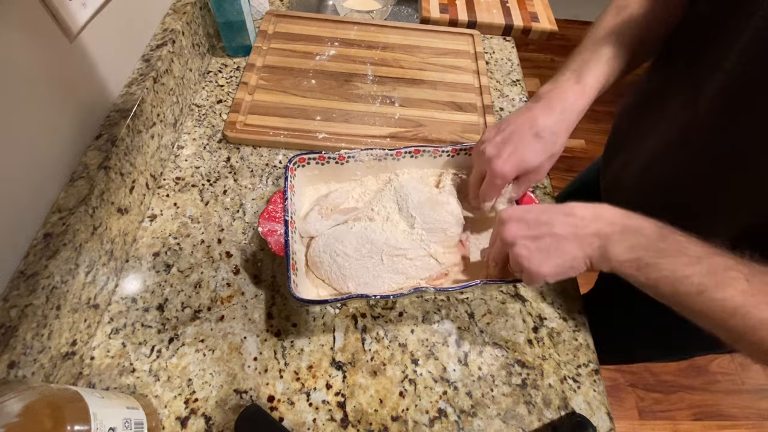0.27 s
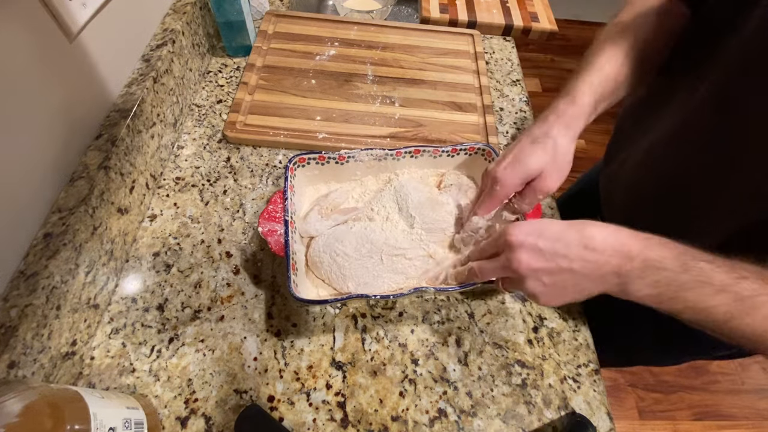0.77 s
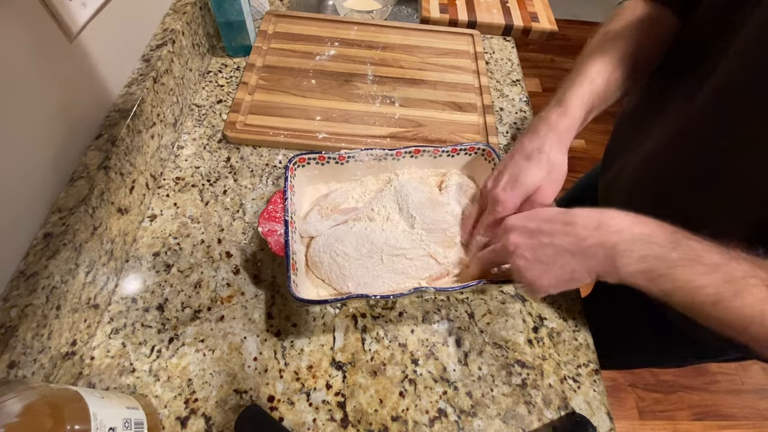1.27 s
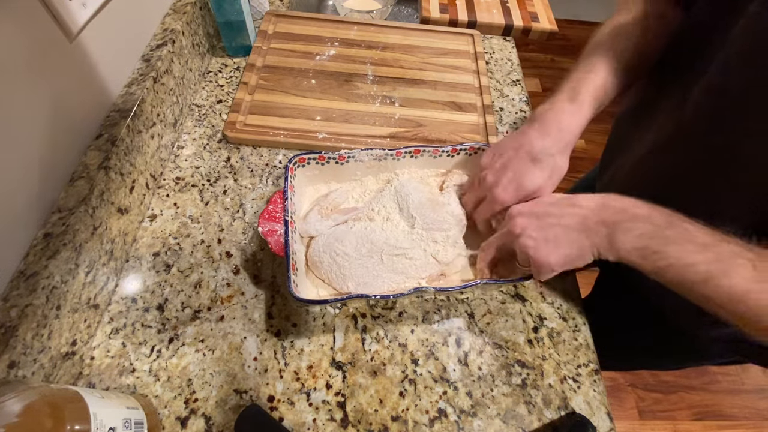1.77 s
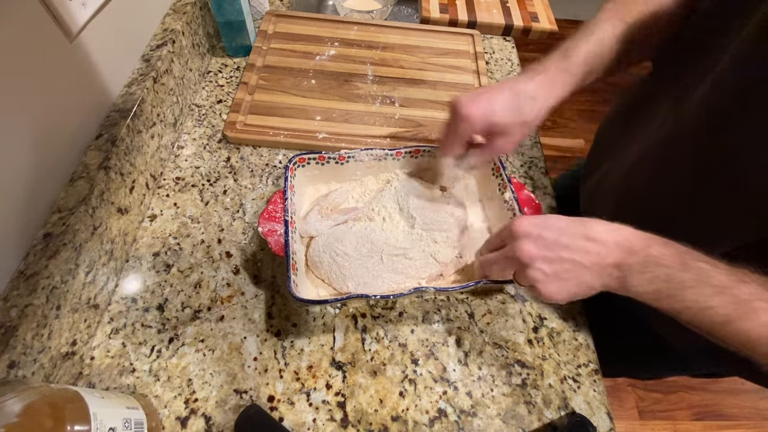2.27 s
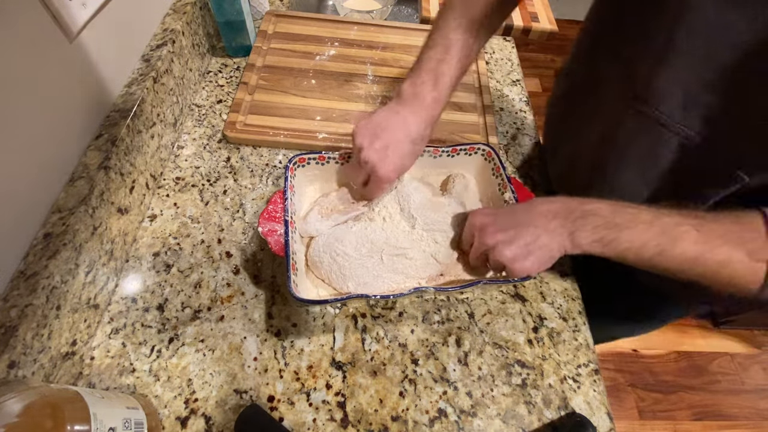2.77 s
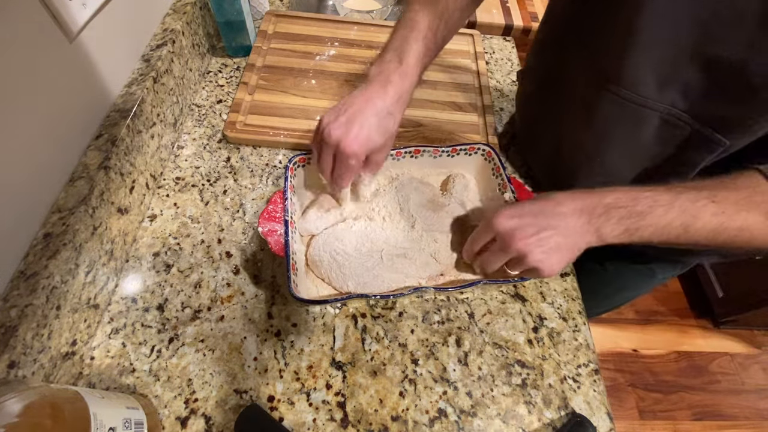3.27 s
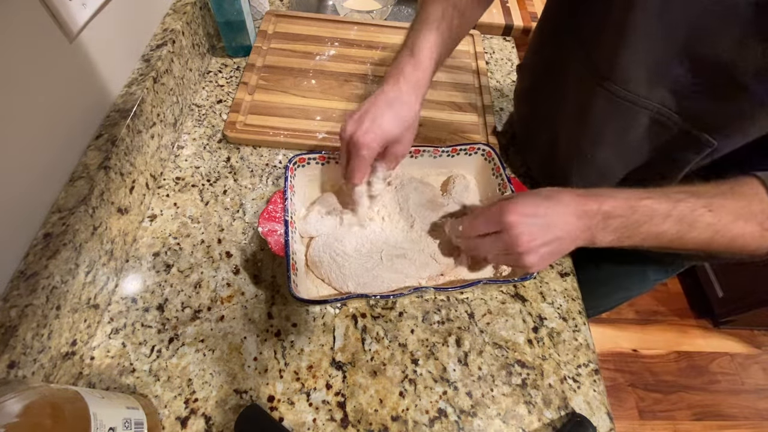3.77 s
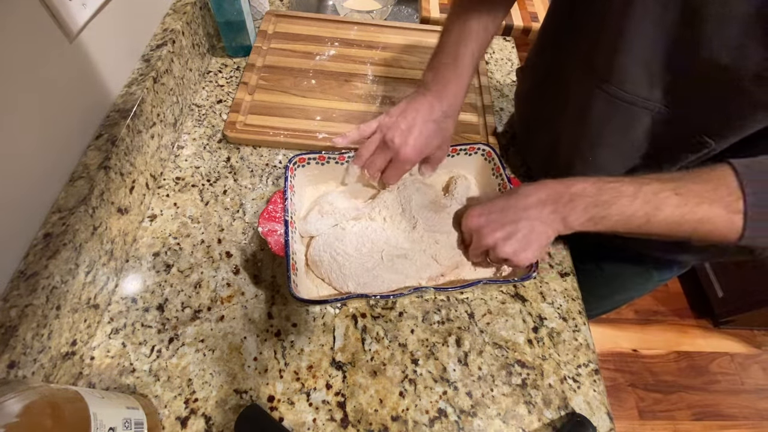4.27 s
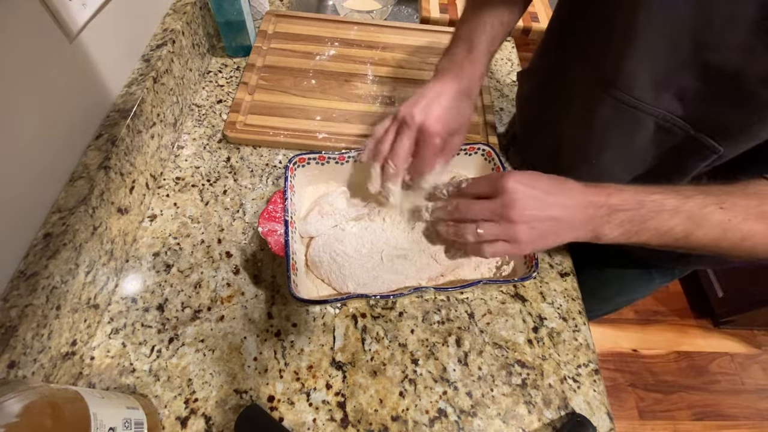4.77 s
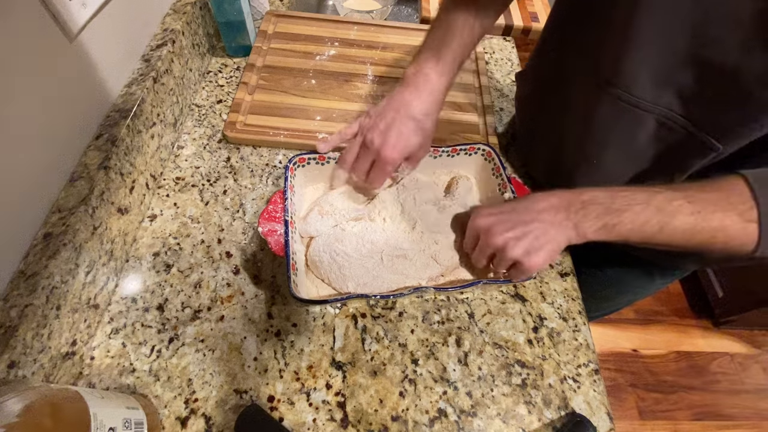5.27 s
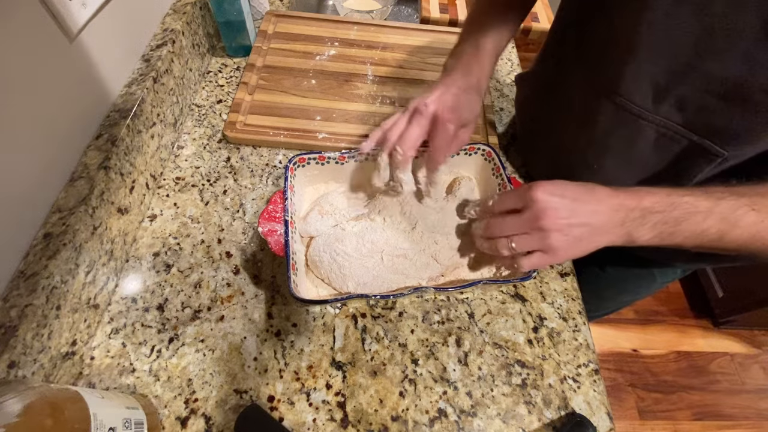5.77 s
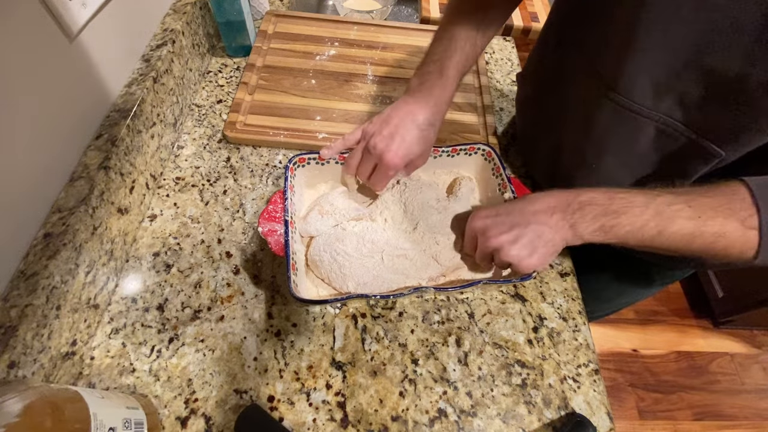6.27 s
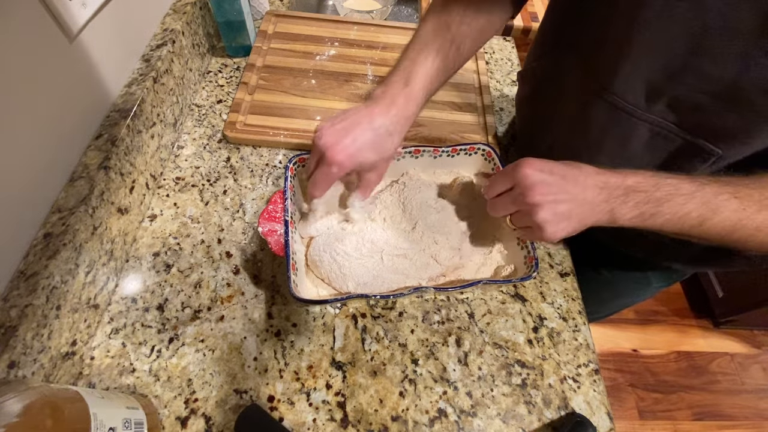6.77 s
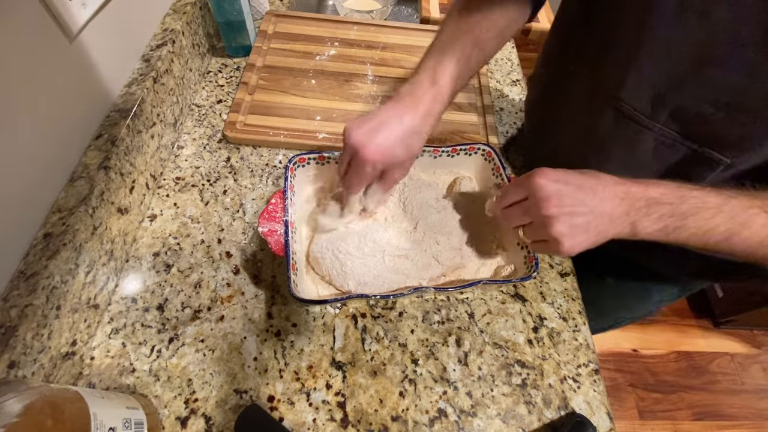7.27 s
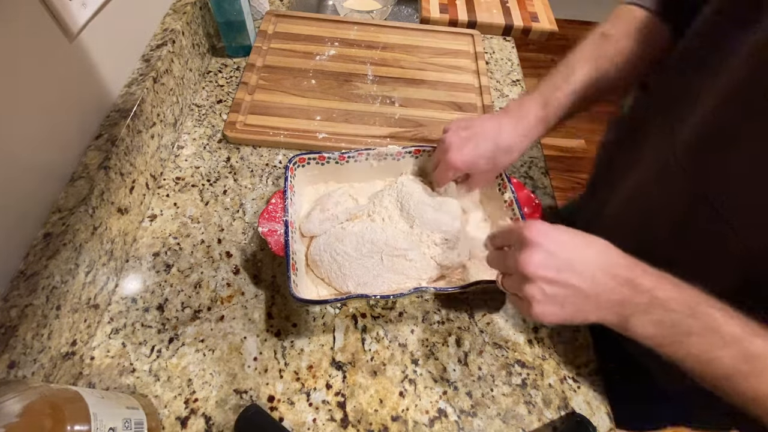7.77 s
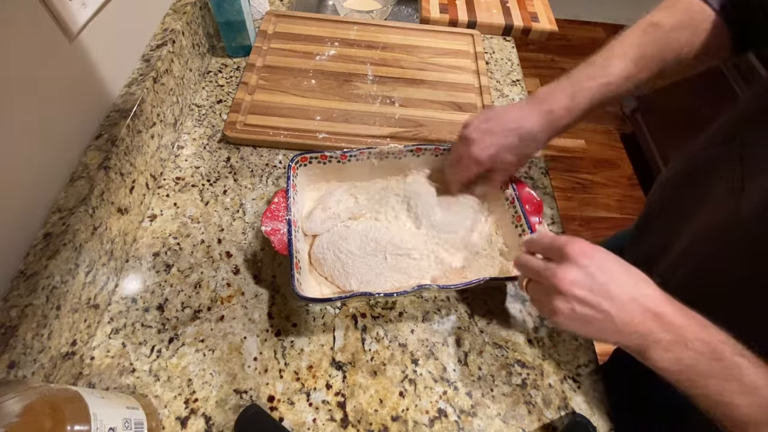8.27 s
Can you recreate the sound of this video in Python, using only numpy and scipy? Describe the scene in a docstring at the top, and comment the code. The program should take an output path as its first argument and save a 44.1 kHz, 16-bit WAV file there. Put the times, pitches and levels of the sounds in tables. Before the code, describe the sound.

A stereo microphone near a stone counter picks up soft, airy flour rustling from two hands coating chicken. Small dish bumps come first, then mostly gentle rubbing with sparse sticky clicks and muffled pats, a clear ceramic tap past the middle, and sharper ticks later. Finally the ceramic dish is shoved and set down hard, the loudest event, with brief room reflections. Deep steady hum and quiet air lie underneath.

```python
"""Humming kitchen, stone counter: hands rub and pat dry flour onto raw chicken in a ceramic dish.
Flour hisses as dense random grains; sticky skin ticks and judders as short bursts of coloured noise.
The meat thuds as damped sines; fingers nudge the dish, a bank of decaying modes.
The dish scrapes briefly over the stone at the start and near the end, where it also knocks down hard.
Behind it lie wavering hum lines, a low rush of air and a faint hiss."""
import sys
import numpy as np
from scipy import signal
from scipy.fft import rfft, irfft, next_fast_len
from scipy.io import wavfile

SR = 44100
rng = np.random.default_rng(int(sys.argv[2]) if len(sys.argv) > 2 else 0)


def dump_mix(stems):
    """Bounce the given channels to the path in sys.argv[1] as a 16-bit WAV at rate SR."""
    frames = np.atleast_2d(stems).T  # one column per channel
    limited = np.clip(frames, -1, 1)  # hard clip at full scale
    pcm = np.round(limited * 32767).astype(np.int16)
    wavfile.write(sys.argv[1], SR, pcm)


N = 376173
TIME_S = np.arange(N) / SR

# strokes of the fingers through the flour: (fastest moment [s], speeding up [s], slowing down [s],
# powder hiss [dB], skin rasp over the hiss before its gain [dB], meat smear likewise [dB])
STROKES = [(.012, 0.055, 0.054, -70, -2, -0.5), (.24, 0.033, 0.024, -73.5, -2, -6.5),
           (.35, 0.044, 0.018, -81, -15, -2.5), (.46, 0.084, 0.17, -72.5, -4, -11),
           (.62, 0.17, 0.14, -75, -3.5, -9), (1.15, 0.1, 0.067, -66.5, -1, -12),
           (1.26, 0.058, 0.019, -68, -13, -16), (1.42, 0.17, 0.071, -89.5, 3.5, -17),
           (1.60, 0.017, 0.021, -74.5, -9, -5), (1.80, 0.15, 0.077, -72, 1.5, -5.5),
           (1.95, 0.19, 0.074, -76.5, 1.5, -2), (1.995, .02, .025, -73, -14, -10),
           (2.145, 0.035, 0.036, -81, -5, -10), (2.43, 0.057, 0.12, -76.5, -3, -2.5),
           (2.52, 0.034, .03, -83, 1, -9), (2.64, 0.11, 0.049, -78, 1.5, 3),
           (2.72, 0.17, 0.12, -77, -2, -10), (3.00, 0.15, 0.099, -84, 5.5, -1.5),
           (3.25, 0.088, 0.043, -86, 9.5, -14), (3.385, 0.067, 0.15, -79.5, -4, -0.5),
           (3.53, 0.096, 0.052, -75.5, -3.5, -4), (3.71, 0.14, 0.072, -73, -1.5, -7.5),
           (3.87, 0.039, 0.031, -74.5, -11, -10), (3.96, 0.037, 0.046, -80, -2, -12),
           (4.10, 0.17, 0.2, -70, -6, -14), (4.38, 0.17, 0.19, -73, -5.5, -5.5),
           (4.465, 0.05, 0.045, -69.5, -5, -7), (4.515, 0.031, .035, -73, -5, -12),
           (4.63, 0.038, 0.023, -80, -2, -16), (4.73, 0.046, 0.069, -82, -15, -8),
           (5.07, 0.045, 0.084, -75.5, -19, -16), (5.225, 0.049, 0.13, -71.5, -15, -24),
           (5.30, 0.057, 0.061, -77, 0, 6.5), (5.45, 0.077, 0.048, -75, -6, -12),
           (5.535, 0.051, 0.07, -71.5, -8, -22), (5.70, 0.026, 0.037, -73, -8, -22),
           (6.015, 0.08, 0.067, -79.5, -9, -1), (6.18, 0.082, 0.16, -69.5, -2, -5),
           (6.36, 0.092, 0.045, -74, -8, -8), (6.455, 0.053, 0.03, -71, -8, -24),
           (6.56, 0.015, 0.017, -78, -6, -11), (6.81, 0.13, 0.093, -84, 5.5, -1.5),
           (6.9, 0.04, 0.021, -74.5, -6, -21), (6.962, .015, .025, -79, 2, -18),
           (7.06, 0.059, 0.082, -80, 7.5, 5), (7.24, 0.12, 0.1, -82.5, 2, -9),
           (7.38, 0.18, 0.14, -87.5, 6, 5), (7.53, 0.071, 0.092, -85.5, 2, -1),
           (7.74, 0.084, 0.048, -80.5, 7, 3), (7.85, 0.068, 0.12, -72.5, 7, 2),
           (8.00, 0.12, 0.19, -72.5, 4, -1), (8.115, 0.038, 0.039, -69, 5.5, -5.5),
           (8.21, 0.093, 0.51, -85.5, 13, 12), (8.33, 0.073, 0.064, -93, 8, 0),
           (8.415, 0.027, 0.12, -75, 3.5, 0.5)]
# relative spectra of loose powder, floured skin under pressure, meat sliding: (frequency [Hz], density [dB])
POWDER_SPECTRUM = [(2500, -6.5), (4200, -3), (6500, 0.5), (10000, 3), (12000, 2.5), (14000, 5),
                   (15200, -4.5), (16000, -9)]
SKIN_SPECTRUM = [(1500, -0.5), (2400, -4), (3300, 4), (4400, 1), (5500, 0.5), (6500, 4.5), (9000, -5.5),
                 (15000, -17)]
MEAT_SPECTRUM = [(400, -0.5), (900, 3), (1400, 0), (2100, 1), (2700, -9.5), (4000, -18)]
SPEED_POWER = 1.6  # friction noise grows as sliding speed to this power
IDLE_POWDER_DB, IDLE_SKIN_DB, IDLE_MEAT_DB = -96, -94.5, -107  # the fingers never quite rest
SKIN_GAIN_DB, MEAT_GAIN_DB = -2, 6.5  # for all strokes
TREMOR_DB, TREMOR_PER_S = 2, 60  # unevenness of the sliding fingers
CRUMBS_PER_S, CRUMB_DB = 160, -7.5  # small lumps breaking, relative to the fine grains

# damp fingers catch and judder: (fastest moment [s], speeding up [s], slowing down [s],
# centre of the rasp [Hz], level before the speed envelope [dB], lag of the left microphone [ms])
CATCHES = [(.222, 0.013, .02, 5000, -82, .2), (1.143, 0.056, 0.015, 4360, -72, 0.24),
           (1.82, 0.032, .03, 4660, -71, 0.23), (2.137, .005, .014, 4900, -76, .25),
           (2.602, .008, .008, 2550, -62.5, 0.32), (2.652, .022, 0.012, 2860, -65.5, 0.34),
           (3.695, 0.037, 0.045, 4500, -80, 0.18), (3.828, .01, .012, 3000, -79, 0.3),
           (3.895, .012, .015, 4300, -83, .2), (4.468, .02, 0.024, 2280, -71, 0.32),
           (7.83, 0.021, .02, 2600, -69, -0.33), (8.11, .01, 0.023, 2600, -67, -0.4)]
JUDDER_PER_S, JUDDER_SCATTER_DB = 900, 1  # slips of a catching finger

# ticks of sticky skin and crumbs, relative levels: (time [s], moist snap [dB], dry crackle [dB])
TICKS = [(0.065, -83, -62.5), (0.194, -48.5, -78), (0.2703, -61, -62), (0.418, -79, -56), (0.315, -69, -74),
         (0.77, -90, -74), (0.802, -87, -65), (0.809, -90, -66), (0.824, -88, -63), (0.986, -55.5, -58),
         (1.028, -62, -89), (1.319, -67, -65), (1.5937, -69, -85), (3.635, -73, -68), (3.654, -71, -78),
         (3.713, -49.5, -80), (3.8224, -64.5, -73), (4.24, -64, -65), (4.447, -71, -64), (4.682, -88, -71),
         (4.737, -68, -69), (5.615, -79, -66), (5.696, -76, -64), (7.018, -64, -75), (7.044, -46, -43.5),
         (7.154, -75, -64), (7.1818, -65, -57.5), (7.651, -62.5, -64), (7.6744, -80, -65),
         (7.991, -68, -51), (8.108, -57, -79), (8.1748, -51, -49), (8.4055, -54, -72), (8.42, -54, -55)]
# relative spectra of the moist snap and the dry crackle: (frequency [Hz], density [dB])
SNAP_SPECTRUM = [(1500, -25), (2800, -16), (3900, -12.5), (4600, -8.5), (5300, -14.5), (6000, -11.5),
                 (9000, -32), (16000, -51)]
CRACKLE_SPECTRUM = [(3000, -38), (7000, -3.5), (11000, -1.5), (14000, 1), (16000, -14)]

# soft pats on the meat: (time [s], relative level [dB], pitch [Hz])
PATS = [(0.276, -37.5, 99.4), (0.801, -42.5, 139.5), (0.992, -39.5, 187), (1.008, -39, 123),
        (1.585, -41.5, 137.7), (2.3, -44, 311), (2.313, -43, 103), (2.896, -41, 136), (3.957, -39.5, 131),
        (3.989, -43.5, 144), (4.337, -52, 134), (5.291, -38.5, 153), (7.049, -40.5, 130),
        (7.631, -39.5, 184), (7.665, -45.5, 96), (7.867, -40, 224), (7.976, -38, 168), (8.188, -41, 107),
        (8.294, -32.5, 203)]
PAT_CYCLES = 22  # swings of the meat until its decay reaches -60 dB

# knocks of the dish: (time [s], relative level [dB], centre of the modes reached [Hz], spread [octaves],
# ring length [share of the free ring], lag of the left microphone [ms], clatter over the ring [dB])
KNOCKS = [(0.055, -50.5, 760, 0.22, 1.45, -0.26, -5), (.452, -49.5, 710, 0.39, 1, -0.26, -4),
          (.902, -74, 1800, 0.83, 0.41, 0.12, -1), (0.988, -63.5, 1200, 0.35, 0.4, 0.23, -1),
          (2.128, -57.5, 2230, 0.34, 0.66, 0.34, 6), (2.134, -51, 580, 0.17, 0.55, 0.4, -7),
          (2.593, -53.5, 2050, 0.7, 0.43, 0.33, 0), (2.597, -54.5, 610, 0.12, 1.2, 0.46, -6),
          (2.614, -58.5, 1300, .8, 0.89, 0.37, 6), (2.642, -56, 677, .55, 1.3, 0.33, 3),
          (2.729, -58, 816, 0.18, 1, -0.33, -3), (2.844, -69, 750, 0.49, 0.92, 0.38, 0),
          (5.281, -44.5, 824, 0.18, 1.05, -0.33, -4), (5.281, -55, 1960, 0.46, 0.81, -0.34, 9),
          (7.043, -58, 2300, 1.3, 0.74, .21, 0), (7.856, -56.5, 2420, 0.17, 0.33, -0.4, -3),
          (7.859, -46, 704, 0.4, 0.75, -0.58, -4), (7.951, -46.5, 770, 0.22, 1, -0.46, -6),
          (8.071, -52.5, 846, 0.17, 0.93, -0.29, -6), (8.2883, -32.5, 1400, 1, 0.46, -0.75, -5.5),
          (8.2916, -32, 980, 1.1, 0.49, -0.48, -3), (8.2972, -35, 1200, 0.55, 0.43, -0.59, -6),
          (8.311, -43, 1260, 0.18, .55, -0.58, 0), (8.342, -55, 1200, 0.42, 0.6, -.7, -2),
          (8.378, -47.5, 780, 0.39, 0.73, -0.42, -1)]
# modes of the loaded dish: (frequency [Hz], relative level [dB], free t60 [s])
DISH_MODES = [(220, 4, 0.075), (357, 7.5, 0.038), (474, -4.5, 0.19), (586, -4.5, 0.18), (681, -7.5, 0.092),
              (746.5, -3, 0.091), (787, -6, 0.062), (916, 1, 0.059), (1010, -15, 0.033), (1058, 2.5, 0.041),
              (1185, -4, 0.088), (1273, -4.5, 0.09), (1410, 0, 0.064), (1600, -7.5, 0.06), (1716, 0, 0.028),
              (1840, -2.5, 0.057), (2003, -14, 0.09), (2170, -8, 0.05), (2330, -3.5, 0.041),
              (2705, -12.5, .04), (2890, -18, .04), (3170, -17, 0.046), (3500, -23, 0.027),
              (4370, -22, 0.041), (5270, -14, .05)]
# a firm blow's contact time; it doubles for each step of dB below firm
FIRM_CONTACT_S, FIRM_DB, CONTACT_DB_PER_DOUBLING = 0.00056, -33, 6.5
BLOW_DB = -13  # gain of all knocks
# t60 at full ring length; spread as a multiple of the ring's; tilt about the centre
CLATTER_T60_S, CLATTER_REACH, CLATTER_DB_PER_OCTAVE = 0.051, 3.2, -3

# shoves that slide the dish: (fastest moment [s], speeding up [s], slowing down [s], level at the peak [dB])
SHOVES = [(.03, 0.11, .06, -60), (.445, 0.037, 0.021, -58), (7.76, 0.037, .02, -62), (7.98, 0.19, 0.2, -61),
          (8.35, 0.039, 0.086, -56)]
# relative spectrum of the foot scraping on stone: (frequency [Hz], density [dB])
DRAG_SPECTRUM = [(150, -2), (300, 7.5), (550, -2), (850, -6), (1050, 8), (1220, 6), (1500, -13),
                 (2400, -11.5), (5000, -38)]

# edges of the foot landing one after another: (time [s], level before the decay [dB])
LANDINGS = [(8.2879, -27), (8.2920, -26.5), (8.299, -34.5)]
# relative spectrum of the foot crunching onto floury stone: (frequency [Hz], density [dB])
LANDING_SPECTRUM = [(170, -4), (280, -0.5), (390, 3), (480, 6), (530, -2), (660, 8), (850, -3), (1150, 10),
                    (1600, -3.5), (2300, -4.5), (2700, -6), (3050, -11), (3400, -9), (3900, -22),
                    (4250, -32), (6200, -30), (9000, -48)]
LANDING_T60_S, LANDING_WET_DB = .034, -4  # brief, but loud enough to fill the kitchen

# hum lines of the appliances: (frequency [Hz], mean level [dB], wander of the frequency [Hz])
HUM_LINES = [(55.64, -56.5, 0.92), (138.64, -59.5, 2.93), (229, -89.5, 2.1), (282.8, -71.5, 4.94),
             (404, -72, 6.93), (457, -77.5, 3.25)]
# relative spectra of the rush of air and the faint steady hiss: (frequency [Hz], density [dB])
AIR_SPECTRUM = [(20, -32), (30, -16.5), (46, 8.5), (55, 7), (66, 1.5), (80, 4.5), (97, -0.5), (135, 2.5),
                (165, 0.5), (205, -8.5), (260, -10), (350, -14), (420, -18), (530, -17), (680, -27),
                (790, -29.5), (860, -27), (920, -23), (1050, -32.5), (1500, -44), (3000, -73)]
HISS_SPECTRUM = [(600, -22), (1300, -3), (2000, -4), (4000, -9.5), (7000, -11), (11000, -17.5),
                 (15000, -52)]
# stereo width of the rush of air: (frequency [Hz], side minus mid [dB])
AIR_WIDTH = [(40, -12), (85, -17), (170, -6.5), (350, 1), (700, 2), (2000, 1)]
AIR_DB = -52  # its mid channel, on average
MURMUR_DB, MURMUR_PER_S = 1.64, 11  # bands of the air waver

# decay of the kitchen: (frequency [Hz], t60 [s])
KITCHEN_T60 = [(150, 0.33), (500, 0.3), (1500, 0.42), (4000, 0.35), (14000, 0.43)]
# tint of the reflections, the highest treble soaked up: (frequency [Hz], gain [dB])
REFLECTED = [(20, 0.5), (5000, 0.5), (8000, 0.5), (12000, -2.5), (20000, -4)]
EARLY_T60_S, EARLY_DB = 0.062, 9.5  # first reflections, over the start of the tail
# shading by the recorder's body: (frequency [Hz], left minus right for each ms of left lead [dB])
SHADE = [(80, -4), (220, -8), (500, 4.5), (1100, 18), (2200, -4), (3800, -36), (9000, 9)]
TOP_HZ = 15700


def rubbing():
    """Powder shears in dense grains, pressed skin rasps, meat smears dully; finger gaps shift the colour."""
    power = np.ones((3, N)) * undb([[IDLE_POWDER_DB], [IDLE_SKIN_DB], [IDLE_MEAT_DB]]) ** 2
    for peak_s, rise_s, fall_s, db, rasp_db, smear_db in STROKES:
        gains = undb([db, db + rasp_db + SKIN_GAIN_DB, db + smear_db + MEAT_GAIN_DB])
        power += np.outer(gains ** 2, gesture(peak_s, rise_s, fall_s) ** 2)
    fine, coarse, slow = (grains(rate, scatter_db=2.3) for rate in (5500, 3500, 3000))
    fine = fine + undb(CRUMB_DB) * grains(CRUMBS_PER_S, scatter_db=0.5)
    powder = unit(colour(fine, POWDER_SPECTRUM))
    skin = unit(colour(coarse, SKIN_SPECTRUM))
    meat = unit(colour(slow, MEAT_SPECTRUM))
    friction = np.sum(np.array([powder, skin, meat]) * np.sqrt(power), axis=0)
    friction = shifting(friction, depth_db=1.8, rate=16)
    return friction * undb(TREMOR_DB * walk(TREMOR_PER_S))


def catches():
    """A damp fingertip sticks and slips in a quick irregular burst, coloured by one broad peak."""
    out = np.zeros((2, N))
    for peak_s, rise_s, fall_s, hz, db, lag_ms in CATCHES:
        speed = gesture(peak_s, rise_s, fall_s)
        start_s = peak_s - rise_s
        start = int(start_s * SR)
        burst = slice(start, start + 8192)
        peak = [(0.47 * hz, -17), (0.94 * hz, -4), (hz, 0), (0.99 * hz, -5), (1.2 * hz, -18)]
        rasp = unit(colour(grains(JUDDER_PER_S, JUDDER_SCATTER_DB)[burst], peak))
        add(out, start_s, ports(rasp * speed[burst] * undb(db), lag_ms))
    return out


def ticks():
    """Skin lets go with a short moist snap and a dry crackle of crumbs, both decaying noise."""
    out, t = np.zeros(N), np.arange(4096) / SR - .003
    for s, snap_db, crackle_db in TICKS:
        noise = rng.standard_normal((2, len(t)))
        swell = np.clip(t / 0.0014 + 1, 0, 1)  # the skin peels away rather than parting at once
        snap = colour(noise[0] * swell * fade(t + 0.0014, t60=0.022), SNAP_SPECTRUM)
        crackle = colour(noise[1] * swell * fade(t + 0.0014, t60=0.014), CRACKLE_SPECTRUM)
        tick = unit(snap) * undb(snap_db - 24.0) + unit(crackle) * undb(crackle_db - 21.0)
        add(out, s + t[0], tick)
    return out


def pats():
    """A hand lands on the meat: a soft, quickly damped sine with a dull puff of flour."""
    out, t = np.zeros(N), np.arange(8192) / SR
    for s, level_db, hz in PATS:
        push = (1 - np.exp(-t / 0.0029)) * fade(t, t60=PAT_CYCLES / hz)
        puff = unit(colour(rng.standard_normal(len(t)), [(0.64 * hz, -3), (hz, 0), (1.66 * hz, -9)]))
        thud = np.sin(2 * np.pi * hz * t) + undb(-4.0) * puff
        add(out, s, thud * push / push.max() * undb(level_db - 4.5))
    return out


def knocks():
    """Each blow rings one region of the dish's modes, damped by the hands, with a brief contact clatter."""
    out, t = np.zeros((2, N)), np.arange(12000) / SR - .02
    hz, mode_db, t60_s = np.transpose(DISH_MODES)
    for s, db, centre_hz, spread, length, lag_ms, clatter_db in KNOCKS:
        octaves = np.log2(hz / centre_hz)

        def reach_db(width):
            return mode_db - 12 * np.log(1 + (octaves / width) ** 2)

        sign = rng.choice([-1, 1], len(hz))  # which way each mode bends at the point of contact
        modes = np.sin(2 * np.pi * hz[:, None] * t) * fade(t, length * t60_s[:, None])
        ring = (sign * undb(reach_db(spread))) @ modes
        contact_db = reach_db(spread * CLATTER_REACH) + CLATTER_DB_PER_OCTAVE * octaves
        clatter = colour(rng.standard_normal(len(t)), sorted(zip(hz, contact_db)))
        clatter = clatter * fade(t, t60=CLATTER_T60_S * length)
        contact_s = FIRM_CONTACT_S * 2 ** ((FIRM_DB - db) / CONTACT_DB_PER_DOUBLING)
        press = np.clip(t / contact_s, 0, 1)  # gentler blows press in more slowly
        blow = unit(unit(ring * press) + undb(clatter_db) * unit(clatter * press))
        add(out, s + t[0], ports(blow * undb(BLOW_DB + db), lag_ms))
    return out


def drag():
    """With each shove the foot of the dish sticks and slips on the gritty counter: random grains."""
    sliding = sum(undb(db) * gesture(peak_s, rise_s, fall_s) for peak_s, rise_s, fall_s, db in SHOVES)
    scrape = unit(colour(grains(rate=710, scatter_db=-0.5), DRAG_SPECTRUM))
    return ports(scrape * sliding, lag_ms=-0.28)


def landing():
    """The foot meets the stone edge by edge, each time with a short, dense crunch of noise."""
    out, t = np.zeros(N), np.arange(4096) / SR
    for s, db in LANDINGS:
        crunch = unit(colour(rng.standard_normal(len(t)), LANDING_SPECTRUM))
        attack = np.minimum(t / 0.00067, 1)
        add(out, s, crunch * attack * fade(t, LANDING_T60_S) * undb(db))
    return ports(out, lag_ms=-0.536)


def appliances():
    """Wavering motor hum and a faint hiss with a diffuse rush of air, nearly alike on both sides in the bass."""
    mid, side = shifting(colour(rng.standard_normal((2, N)), AIR_SPECTRUM), MURMUR_DB, MURMUR_PER_S)
    air = mid + colour(side, AIR_WIDTH) * np.array([[1], [-1]])
    air = air / mid.std() * undb(AIR_DB + .5 * walk(4.17))
    hum = 0
    for hz, db, wander_hz in HUM_LINES:
        phase = 2 * np.pi * np.cumsum(hz + wander_hz * walk(20)) / SR
        waver = undb(2.2 * walk(22))
        hum = hum + np.sqrt(2) * np.sin(phase) * undb(db) * waver
    hiss = unit(colour(rng.standard_normal((2, N)), HISS_SPECTRUM)) * undb(-81.5)
    balance = undb(np.array([[-.3], [.3]]))
    return (air + hum) * balance + hiss


def kitchen(x, wet_db):
    """Counter and cabinets reflect early, then the walls return a smooth tail, different at each microphone."""
    t = np.arange(24000) / SR - .004  # reflections start 4 ms after the direct sound
    freqs = np.arange(len(t) // 2 + 1) * SR / len(t)
    noise, tail = rfft(rng.standard_normal((2, 2, len(t)))), 0
    for hz in 125 * 2. ** np.arange(8):  # octave bands
        share = np.maximum(0, 1 - np.abs(np.log2((freqs + 1) / hz)))
        decay = fade(t, at(KITCHEN_T60, hz)) + undb(EARLY_DB) * fade(t, EARLY_T60_S)
        tail = tail + irfft(noise * share) * decay
    tail = colour(unit(tail), REFLECTED) / np.sqrt(2 * len(t))
    wet = signal.fftconvolve(x[None], tail, axes=2).sum(axis=1)[:, :N]
    return x + undb(wet_db) * wet


def gesture(peak_s, rise_s, fall_s):
    """Friction level of one movement: the speed rises and falls in two quarter sines."""
    u = np.clip((TIME_S - peak_s) / np.where(TIME_S < peak_s, rise_s, fall_s), -1, 1)
    moving, out = np.abs(u) < 1, np.zeros(N)
    out[moving] = np.cos(np.pi / 2 * u[moving]) ** SPEED_POWER
    return out


def grains(rate, scatter_db):
    """Random tiny slips, rate per second, with randomly scattered sizes."""
    hit = rng.random(N) < rate / SR
    size = undb(scatter_db * np.minimum(rng.standard_exponential(N), 4))
    return unit(hit * rng.standard_normal(N) * size)


def shifting(x, depth_db, rate):
    """Each third of an octave from about 400 Hz up swells on its own; the bass stays as it is."""
    size = next_fast_len(N)
    spectrum, out = rfft(x, size), x
    octaves = np.log2(np.maximum(np.arange(spectrum.shape[-1]) * SR / size, 1) / 400)
    for band in range(17):
        share = np.maximum(0, 1 - np.abs(3 * octaves - band))
        part = irfft(spectrum * share, size)[..., :N]
        out = out + part * (undb(depth_db * walk(rate)) - 1)
    return out


def ports(x, lag_ms):
    """A source off to one side reaches the far microphone later and shaded."""
    size = next_fast_len(len(x))
    hz = np.arange(size // 2 + 1) * SR / size
    # half the lag and half the shading on each side
    left = np.exp(-1j * np.pi * hz * lag_ms / 1000) * undb(-lag_ms * at(SHADE, hz) / 2)
    return irfft(rfft(x, size) * np.array([left, 1 / left]), size)[:, :len(x)]


def colour(x, points):
    """Shape x by (Hz, dB) points, falling away beyond both ends."""
    size = next_fast_len(x.shape[-1])
    hz = np.maximum(np.arange(size // 2 + 1) * SR / size, 1)
    ends = np.minimum(1, np.minimum(hz / points[0][0], points[-1][0] / hz)) ** 4
    return irfft(rfft(x, size) * undb(at(points, hz)) * ends, size)[..., :x.shape[-1]]


def walk(rate):
    """Random wander with a spread near 1, through rate knots per second."""
    knots = rng.standard_normal(2048)
    return 1.2 * np.interp(TIME_S * rate, np.arange(len(knots)), knots)


def fade(t, t60):
    """Exponential decay from t = 0, falling 60 dB in t60 seconds."""
    return (t >= 0) * np.exp(-np.log(1000) * np.maximum(t, 0) / t60)


def at(points, hz):
    """Read a table over log frequency."""
    f, value = np.transpose(points)
    return np.interp(np.log(np.maximum(hz, 1)), np.log(f), value)


def undb(db):
    """Decibels to gain."""
    return 10 ** (np.asarray(db) / 20)


def unit(x):
    """Scale to rms 1."""
    return x / np.sqrt(np.mean(x ** 2))


def add(out, s, x):
    """Mix x into out from time s."""
    i = max(int(s * SR), 0)
    out[..., i:i + x.shape[-1]] += x[..., :N - i]


def scene():
    """Hands and dish with the kitchen's reflections, the appliances all around."""
    hands = catches() + ports(rubbing() + ticks(), lag_ms=.204)
    dish = knocks() + drag() + ports(pats(), lag_ms=-0.11)
    near = kitchen(hands, wet_db=-3.0) + kitchen(dish, wet_db=-6.0)
    return near + kitchen(landing(), LANDING_WET_DB) + appliances()


def record(dry):
    """The recorder cuts the top: a steep elliptic low-pass."""
    return signal.sosfilt(signal.ellip(8, .2, 70, TOP_HZ, fs=SR, output="sos"), dry)


dry = scene()
out = record(dry)
dump_mix(out)
```